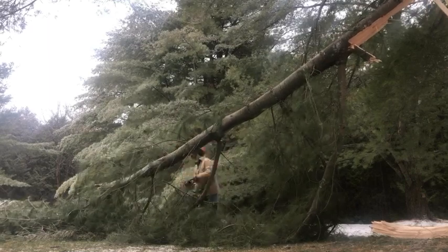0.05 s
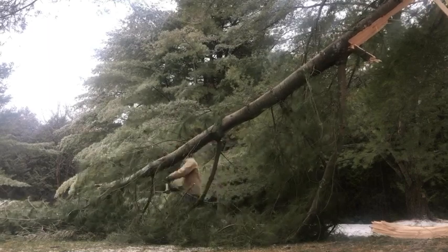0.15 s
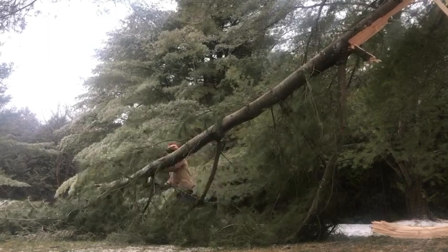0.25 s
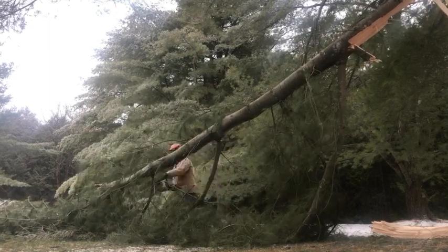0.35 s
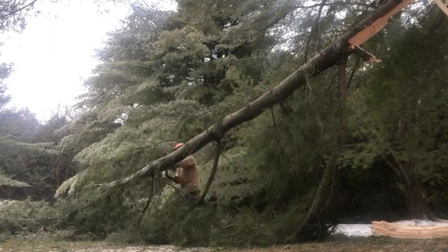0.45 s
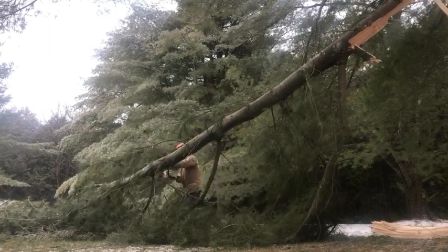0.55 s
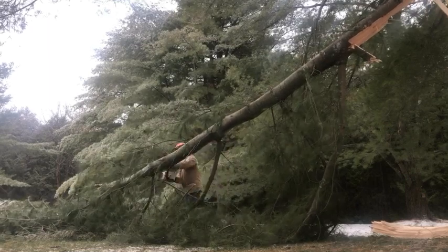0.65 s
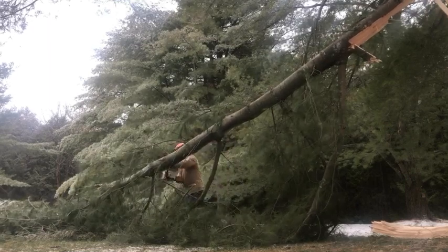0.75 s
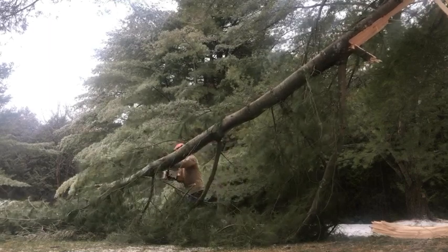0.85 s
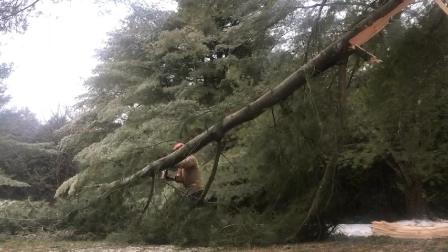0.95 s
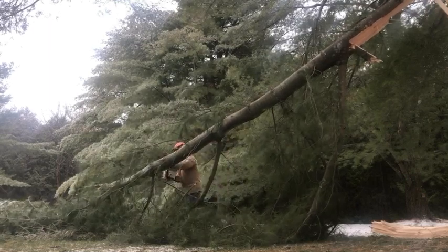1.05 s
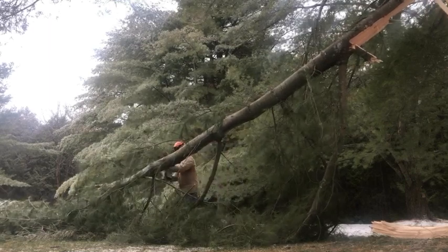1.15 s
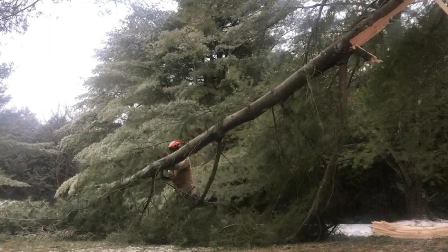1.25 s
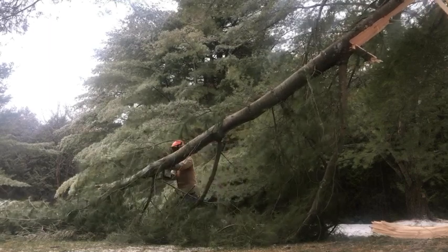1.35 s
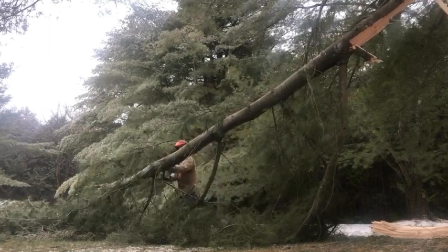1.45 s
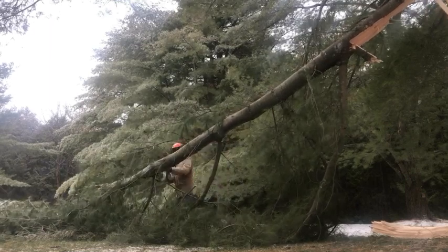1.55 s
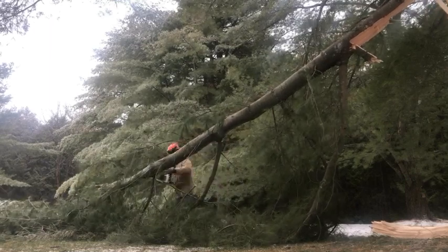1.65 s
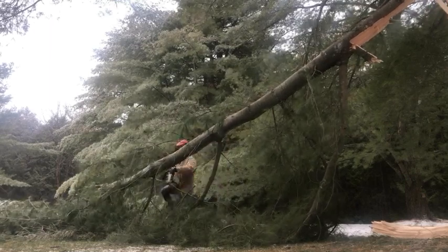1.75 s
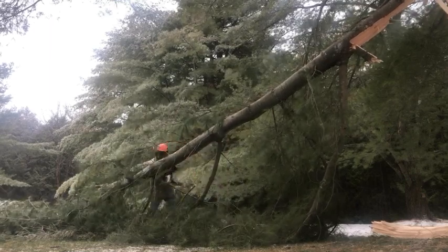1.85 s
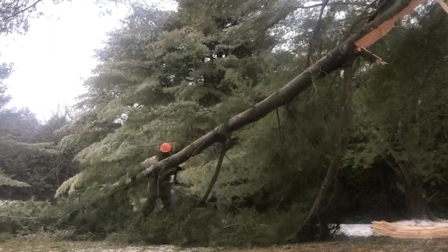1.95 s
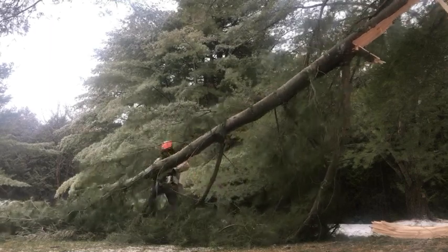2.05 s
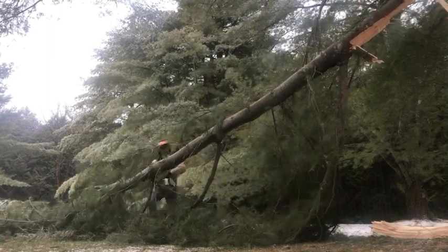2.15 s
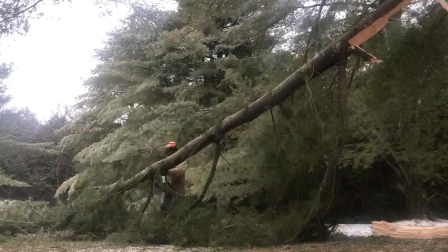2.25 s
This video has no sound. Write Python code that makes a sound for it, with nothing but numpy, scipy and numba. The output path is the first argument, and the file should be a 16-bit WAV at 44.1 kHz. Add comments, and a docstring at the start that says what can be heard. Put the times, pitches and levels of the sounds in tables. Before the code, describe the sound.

Gasoline chainsaw blips, roars at full throttle through wood, blips once more, then idles with clinking chain

```python
"""Chainsaw in a pine limb

A two-stroke chainsaw is blipped, held at full throttle in a pine limb, blipped once more and left to idle.
Firing pulses excite the muffler resonances; noise gated by the firing cycle gives gas rasp and chain hiss.
At idle a wavering tone hums and noise bursts ring the bar as the loose chain clinks; it squeals thinly too.
Needles brush past near the end, the trees scatter a faint echo, and filtered noise is the outdoor air."""
import sys
import numpy as np
from scipy import signal
from scipy.fft import rfft, irfft
from scipy.io import wavfile
from scipy.ndimage import uniform_filter1d
from numba import njit

SR = 44100
rng = np.random.default_rng(int(sys.argv[2]) if len(sys.argv) > 2 else 0)


def materialize(psi):
    """Save the field psi as 16-bit PCM at rate SR to the path in sys.argv[1].

    A 1-D psi becomes a single channel; in a 2-D psi each row is a channel.
    """
    bounded = np.clip(np.atleast_2d(psi).T, -1, 1)
    quanta = np.round(bounded * 32767).astype(np.int16)
    wavfile.write(sys.argv[1], SR, quanta)


N = 101430
TIME = np.arange(N) / SR

# Spectra: frequency_hz, relative_density_db (each filter is scaled to unit power gain)
# quiet outdoor air
AIR_SPECTRUM = [(25,-2),(70,13),(200,12),(600,-20),(1500,-17),(15000,-70)]
# echo from trunks and branches
ECHO_SPECTRUM = [(100, -8.5), (700, -1), (2500, 4.5), (4000, -1.5), (15000, -3)]
# brushing pine needles
NEEDLE_SPECTRUM = [(2000,-25),(4500,0),(5500,-17),(7000,-6),(8300,6),(9300,-3),(10500,-7),(15000,-13)]
# chain sliding along the bar at idle
IDLE_CHAIN_SPECTRUM = [(880, -36), (1500, -4), (1790, -11), (1970, -4), (2310, -7.5), (2750, -6.5),
                       (2970, -3.5), (3830, 4), (4020, 0), (5720, -7), (8710, -9.5), (10200, -16),
                       (11200, -24), (12300, -16), (15500, -20)]
# soft exhaust puffs at idle
IDLE_PUFF_SPECTRUM = [(40,-63),(100,-3),(200,8),(330,9),(480,7.5),(650,3),(900,-1),(1200,-1),(1700,-34.5),(4000,-31)]
# carburettor bark
INTAKE_SPECTRUM = [(40,-31),(70,-25),(105,8.5),(150,13),(220,7.5),(320,-22),(450,-6),(560,4),(670,6.5),(800,11),(920,9.5),(1100,-29),(1400,-51.5),(4000,-49)]
# muffler body
MUFFLER_SPECTRUM = [(40,-34),(75,-10),(105,-4),(165,7.5),(220,11.5),(300,6),(430,5.5),(550,0.5),(670,-1),(800,5.5),(890,7),(1020,-11),(1120,-1.5),(1330,-2.5),(1520,-7.5),(1750,-25.5),(2000,-21.5),(2600,-15.5),(5000,-27)]
# crack at the muffler outlet
OUTLET_SPECTRUM = [(500,-29),(1700,-37),(1970,-6.5),(2200,-14),(2450,-2.5),(2800,-11),(3070,4),(3250,-6.5),(3430,10),(3600,-1),(3750,-28),(3960,1.5),(4500,-7),(5300,-22.5),(12000,-24)]
# rasp of spat gas, also the dull part of a clink
RASP_SPECTRUM = [(200,-40),(1000,-10),(1750,-42),(2100,-12.5),(2500,-3),(2900,-5),(3450,2),(3800,0),(4300,-4.5),(5200,-15.5),(7000,-17.5),(16000,-14.5)]
# chain hissing through the wood, also the bright scrape of a clink
CHAIN_SPECTRUM = [(1000,-24),(3000,0.5),(5300,-8),(6400,0),(7100,-2.5),(8000,1.5),(9600,-8),(11200,-1.5),(13200,-5),(15000,-7.5),(16000,-4.5)]

# Modes of the steel bar and chain: frequency_hz, width_hz, relative_level_db
BAR_MODES = [(2860,8.9,5),(3416,130,-2),(3782,42,1.5),(3830,43,4),(4240,65,1.5),(4570,96,-10),(6530,60,-2.5),(8650,350,-11),(10870,310,-19)]
# Chain clinks on the bar: middle_s, level_db, bright_scrape_db (relative levels)
CLINKS = [(.036,-33,-45),(.105,-33,-39),(1.514,-36,-49),(1.574,-32,-38),(1.594,-44,-43),(1.689,-37,-51),(1.716,-36,-47),(1.751,-38,-47),(1.786,-34,-48),(1.813,-37,-49),(1.855,-36,-48),(1.876,-37,-44),(1.892,-38,-46),(2.080,-35,-48)]
# Idling saw: time_s, hum_pitch_hz, hum_level_db, chain_level_db (levels before trims)
IDLE = [(0,218.4,-40,-38.5),(.18,215,-46,-38),(1.35,201,-47,-40.5),(1.48,195.5,-45,-40),(1.63,191,-44.5,-40),(1.78,189,-41,-39),(1.88,211,-35,-38),(1.98,221,-35.5,-34),(2.05,221.2,-37.5,-37.5),(2.13,226,-40.5,-34),(2.3,242.5,-40,-33)]
# Intake barks as the throttle snaps open: start_s, length_s, level_db
GULPS = [(0.197,0.033,-22.5),(0.248,0.029,-24),(0.403,0.059,-26.5),(1.226,0.041,-23),(1.375,0.049,-23.5)]
# Drone of the engine running on with the throttle shut: multiple_of_firing_rate, level_db (before its gates)
DRONE_HARMONICS = [(1,-34),(2,-35),(3,-41)]
# Engine speed on the throttle: time_s, firings_per_s
SPEED = [(0.2, 93.7), (0.22, 127.0), (0.23, 133.9), (0.248, 127.2), (0.278, 179.0), (0.306, 212.1),
         (0.316, 212.7), (0.334, 191.7), (0.364, 135.3), (0.41, 95.3), (0.43, 134.3), (0.44, 153.7),
         (0.468, 140.4), (0.51, 197.9), (0.54, 211.9), (0.578, 186.3), (0.614, 219.2), (0.624, 216.4),
         (0.654, 169.0), (0.686, 183.1), (0.714, 168.2), (0.748, 208.2), (0.762, 220.9), (0.956, 219.1),
         (0.996, 227.1), (1.07, 226.7), (1.1, 188.0), (1.148, 223.5), (1.176, 210.3), (1.222, 164.0),
         (1.262, 165.8), (1.308, 114.1), (1.36, 83.1), (1.388, 111.6), (1.418, 114.5), (1.44, 102.9)]
# Saw on the throttle: time_s, exhaust_level_db, rasp_level_db (before trims)
REVS = [(0.2, -25, -31), (0.216, -23, -27), (0.244, -30, -32), (0.278, -19, -21), (0.312, -18, -20),
        (0.344, -28, -20), (0.406, -33, -32), (0.43, -23, -20), (0.462, -29, -25), (0.49, -20, -20),
        (0.548, -18, -19), (0.62, -18, -19), (0.644, -27, -20), (0.662, -23, -22), (0.7, -20, -17),
        (0.724, -21, -21), (0.744, -17, -17), (0.832, -15, -20), (0.914, -17, -19), (0.966, -15, -19),
        (1.076, -20, -17), (1.09, -23, -21), (1.128, -17, -18), (1.25, -21, -19), (1.3, -37, -38),
        (1.35, -49, -51), (1.364, -36, -50), (1.37, -30, -36), (1.394, -23, -26), (1.418, -23, -24),
        (1.44, -34, -39)]
# Chain in the wood: time_s, hiss_level_db (before trim)
HISS = [(0.2, -36), (0.224, -24.5), (0.248, -28), (0.298, -17.5), (0.406, -30), (0.442, -22), (0.462, -24),
        (0.498, -19), (0.628, -18.5), (0.648, -21.5), (0.834, -17.5), (1.126, -20), (1.14, -18.5),
        (1.258, -22), (1.35, -49), (1.386, -30), (1.41, -36.5), (1.46, -32.5)]

AIR_DB, ECHO_DB, ECHO_T60_S = -50.5, -12, 0.18
SWISH_S, SWISH_RISE_S, SWISH_DB = 2.03, 0.034, -42.5
SQUEAL_S, SQUEAL_LENGTH_S, SQUEAL_HZ, SQUEAL_WIDTH_HZ, SQUEAL_DB = 1.87, 0.23, 11060, 300, -48
CLINK_RISE_S, CLINK_FALL_S = 0.005, 0.007
IDLE_HZ, COAST_S, HUM_WAVER_HZ = 44.4, 0.088, 7.5  # firings per s, time constant, rms pitch wander
HUM_TRIM_DB, CHAIN_TRIM_DB, IDLE_PUFF_DB, BAR_RING_DB = -1.5, -3.0, -40, -5
GULP_EDGE_S = 0.0042
FULL_HZ = 222.7  # firings per s at full speed
JITTER_FULL, JITTER_SLOW, SCATTER_DB = 0.001, 0.009, 1.0  # rate jitter as fractions; pulse level spread
GAS_DB, SLOW_GAS_DB = -17, 6  # gas noise against the pulses, and its rise at low speed
EXHAUST_TRIM_DB, SLOW_EXHAUST_DB = -0.7, -5.5
CRACK_DB, SLOW_CRACK_DB = -2.5, -7.5
SPIT_DB, SLOW_SPIT_DB = -3.5, 3.6
HISS_TRIM_DB = 1
SHUT_DB = -24  # exhaust level under which the drone takes over
OPEN_S, CLOSE_S = 0.0028, 0.04  # time constants: the first burst starts, the last dies away
TOP_HZ = 15850


def undb(db):
    """Logarithmic level: decibels become an amplitude gain."""
    return 10 ** (np.asarray(db) / 20)


def unit(x):
    """Normalization: the rms becomes 1."""
    return x / np.sqrt(np.mean(x ** 2) + 1e-18)


def even(x):
    """Power levelling: a running rms stays at 1, whichever resonance the harmonics pass."""
    return x / np.sqrt(uniform_filter1d(x ** 2, size=1600) + 1e-12)


def curve(table, axis):
    """Linear interpolation: one column of a table is joined by straight lines in time."""
    rows = np.array(table, float)
    return np.interp(TIME, rows[:, 0], rows[:, axis])


def noise():
    """White noise: independent Gaussian samples have a flat spectrum."""
    return rng.standard_normal(N)


def walk(rate):
    """Random modulation: noise averaged twice over 1 / rate seconds wanders smoothly with rms 1."""
    size = max(int(SR / rate), 1)
    smooth = uniform_filter1d(noise(), size, mode="wrap")
    return unit(uniform_filter1d(smooth, size, mode="wrap"))


def colour(x, points):
    """Minimum-phase filtering: a causal response follows the spectrum and keeps white noise's power."""
    size = 4096
    hz, db = np.array(points, float).T
    bins_hz = np.arange(size + 1) * SR / size / 2
    gain = unit(undb(np.interp(np.log(bins_hz + 1), np.log(hz), db)))
    # folding the cepstrum onto positive time makes the response causal
    cepstrum = irfft(np.log(gain))
    cepstrum[1:size] *= 2
    cepstrum[size + 1:] = 0
    response = irfft(np.exp(rfft(cepstrum)))[:size]
    return signal.fftconvolve(x, response)[:N]


@njit
def resonate(x, hz, width):
    """Resonance: a two-pole state-variable band-pass whose centre may move."""
    y, band, low = np.empty(len(x)), 0., 0.
    for i in range(len(x)):
        g, damping = np.tan(np.pi * hz[i] / SR), width / hz[i]
        v = (band + g * (x[i] - low)) / (1 + g * (g + damping))
        band, low, y[i] = 2 * v - band, low + 2 * g * v, damping * v
    return y


def firings(hz, jitter, scatter_db):
    """Pulse excitation: uneven firings of steady mean power, with the phase (0 to 1) in each cycle."""
    turns = np.cumsum(hz * (1 + jitter * walk(320))) / SR
    beats = np.arange(1, int(turns[-1]))
    at = np.interp(beats, turns, np.arange(N))
    # windowed sincs place each pulse between samples
    index = np.clip(at.astype(int)[:, None] + np.arange(-7, 9), 0, N - 1)
    offset = index - at[:, None]
    shape = np.sinc(offset) * np.cos(np.pi * offset / 16) ** 2
    pulses = np.zeros(N)
    np.add.at(pulses, index, shape * undb(scatter_db * noise()[:len(at), None]))
    return pulses * np.sqrt(SR / hz), turns % 1


def puffs(phase, cycles, steady, grain_db):
    """Amplitude modulation: grainy noise flares at each firing and decays over part of the cycle."""
    flare = steady + np.exp(-phase / cycles)
    return unit(noise() * flare * undb(grain_db * walk(950)))


def bar(x):
    """Modal resonance: the steel bar and chain ring as a sum of band-passes."""
    return sum(undb(db) * resonate(x, np.full(N, float(hz)), float(width)) for hz, width, db in BAR_MODES)


def air():
    """Broadband background: steady noise weighted to the bass stands for quiet outdoor air."""
    return undb(AIR_DB) * colour(noise(), AIR_SPECTRUM)


def trees(x):
    """Diffuse scattering: trunks and branches add a faint, decaying echo with little bass."""
    tail = noise() * undb(-60 * TIME / ECHO_T60_S) * np.minimum(TIME / 0.0033, 1)
    tail = colour(tail, ECHO_SPECTRUM)
    return x + undb(ECHO_DB) * signal.fftconvolve(x, tail / np.linalg.norm(tail))[:N]


def needles():
    """Friction noise: a soft, grainy swish swells as pine needles brush past the moving saw."""
    grains = unit(noise() * undb(3.26 * walk(900)))
    swell = (1 + np.tanh((TIME - SWISH_S) / SWISH_RISE_S)) / 2
    return colour(grains, NEEDLE_SPECTRUM) * undb(SWISH_DB) * swell


def squeal():
    """Narrow-band friction: a thin, stuttering squeal of the chain in its groove swells and fades."""
    tone = unit(resonate(noise(), np.full(N, float(SQUEAL_HZ)), float(SQUEAL_WIDTH_HZ)))
    swell = np.exp(-((TIME - SQUEAL_S) / SQUEAL_LENGTH_S) ** 2)
    return tone * undb(SQUEAL_DB + 4.1 * walk(68)) * swell


def clinks():
    """Impact excitation: short clusters of link impacts ring the bar, each with a bright scrape."""
    knock, scrape = np.zeros(N), np.zeros(N)
    for middle, db, bright_db in CLINKS:
        age = TIME - middle
        shape = np.exp(-(age / np.where(age < 0, CLINK_RISE_S, CLINK_FALL_S)) ** 2)
        knock += undb(db) * shape
        scrape += undb(bright_db) * shape
    links = unit(noise() * undb(2.5 * walk(1200)))
    ring = bar(links * knock) / np.std(bar(links))
    thud = colour(links * knock, RASP_SPECTRUM)
    return 1.04 * ring + 0.54 * thud + colour(links * scrape, CHAIN_SPECTRUM)


def idling():
    """Exponential coasting: firings slow to soft puffs under a wavering hum as the chain slides on the bar."""
    since = TIME - REVS[-1][0]
    hz = IDLE_HZ + (since > 0) * (SPEED[-1][1] - IDLE_HZ) * np.exp(-abs(since) / COAST_S)
    pulses, phase = firings(hz, jitter=0.07, scatter_db=0.5)
    gas = puffs(phase, cycles=0.25, steady=0.6, grain_db=1.0)

    hum_hz = curve(IDLE, axis=1) + HUM_WAVER_HZ * walk(57)
    tone = np.sin(2 * np.pi * np.cumsum(hum_hz) / SR)
    throb = 1 + 0.59 * np.cos(2 * np.pi * phase)
    hum = unit(tone * throb * undb(0.48 * walk(40))) * undb(curve(IDLE, axis=2) + HUM_TRIM_DB)

    # the puffs follow part of the chain's rise and fall
    chain_db = curve(IDLE, axis=3)
    puff_db = IDLE_PUFF_DB + 0.29 * (chain_db - np.mean(chain_db))
    puff = colour(gas + 0.17 * pulses, IDLE_PUFF_SPECTRUM) * undb(puff_db)

    links = puffs(phase, cycles=0.16, steady=2.2, grain_db=2.5)
    slide = colour(links, IDLE_CHAIN_SPECTRUM) + undb(BAR_RING_DB) * unit(bar(links))
    return hum + puff + slide * undb(chain_db + CHAIN_TRIM_DB)


def intake(strokes):
    """Gated excitation: the carburettor barks for a few strokes as the throttle opens on a slow engine."""
    gate = np.zeros(N)
    for start, length, db in GULPS:
        opening = np.tanh((TIME - start) / GULP_EDGE_S)
        closing = np.tanh((TIME - start - length) / GULP_EDGE_S)
        gate += undb(db) * (opening - closing) / 2
    return colour(strokes, INTAKE_SPECTRUM) * gate


def revving():
    """Source and filter: firings ring muffler and outlet; gas and chain noise pulse in step, rougher when slow."""
    hz, exhaust_db, rasp_db = curve(SPEED, axis=1), curve(REVS, axis=1), curve(REVS, axis=2)
    slow = np.clip(2 * (1 - hz / FULL_HZ), 0, 1)  # 0 at full speed, 1 at half speed and below
    pulses, phase = firings(hz, JITTER_FULL + JITTER_SLOW * slow, SCATTER_DB)
    gas = undb(GAS_DB + slow * SLOW_GAS_DB) * puffs(phase, cycles=0.73, steady=0.28, grain_db=2)
    strokes = pulses + gas
    exhaust_gain = undb(exhaust_db + EXHAUST_TRIM_DB + SLOW_EXHAUST_DB * slow ** 2)
    exhaust = even(colour(strokes, MUFFLER_SPECTRUM)) * exhaust_gain

    crack = undb(CRACK_DB + SLOW_CRACK_DB * slow) * colour(pulses, OUTLET_SPECTRUM)
    spit = colour(puffs(phase, cycles=0.9, steady=0.8, grain_db=0.2), RASP_SPECTRUM)
    spit = spit * undb(SPIT_DB + SLOW_SPIT_DB * slow) * undb(1.8 * walk(87))
    rasp = (crack + spit) * undb(rasp_db)

    hiss = colour(puffs(phase, cycles=0.9, steady=1, grain_db=1.0), CHAIN_SPECTRUM)
    hiss = hiss * undb(curve(HISS, axis=1) + HISS_TRIM_DB + 0.5 * walk(60))

    drone = sum(undb(db) * np.sqrt(2) * np.sin(2 * np.pi * k * phase) for k, db in DRONE_HARMONICS)
    # the drone yields to a loud exhaust and sinks with a rasp level under -30 dB
    drone = drone * np.minimum(undb(rasp_db + 30), 1) / (1 + undb(exhaust_db - SHUT_DB) ** 2)

    before = np.minimum(TIME - REVS[0][0], 0)
    after = np.maximum(TIME - REVS[-1][0], 0)
    running = np.exp(before / OPEN_S - after / CLOSE_S)
    return running * (exhaust + rasp + hiss + drone) + intake(strokes)


def scene():
    """Superposition: the saw and needles among the trees add to the air, the same in both channels."""
    sources = revving() + idling() + clinks() + squeal() + needles()
    mono = trees(sources) + air()
    return np.array([mono, mono])


def record(dry):
    """Band limiting: a steep elliptic low-pass cuts the top."""
    return signal.sosfilt(signal.ellip(12, .2, 90, TOP_HZ, fs=SR, output="sos"), dry)


dry = scene()
out = record(dry)
materialize(out)
```